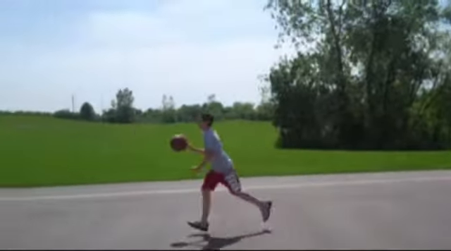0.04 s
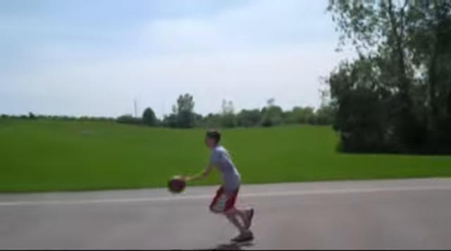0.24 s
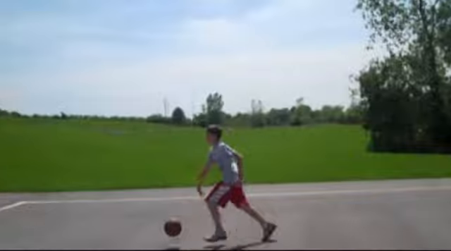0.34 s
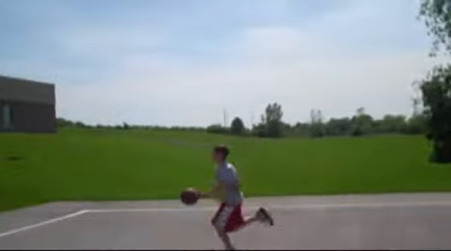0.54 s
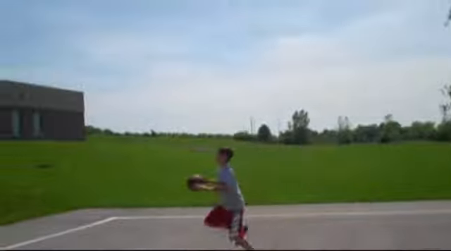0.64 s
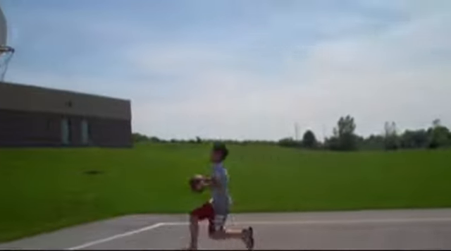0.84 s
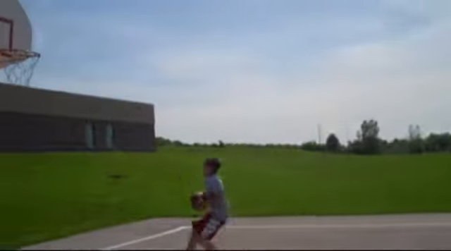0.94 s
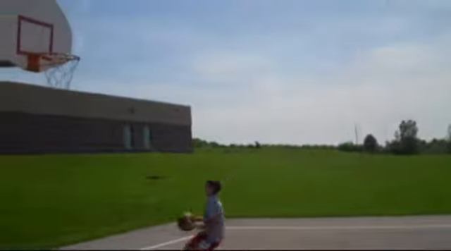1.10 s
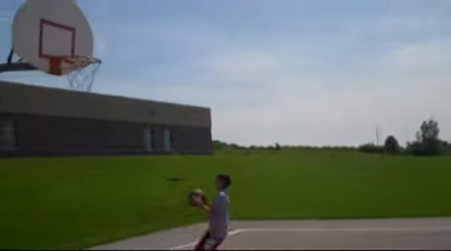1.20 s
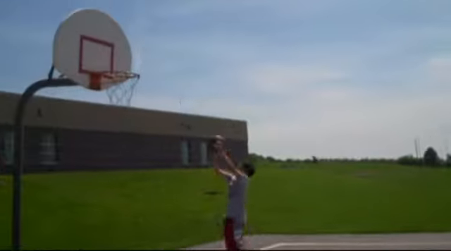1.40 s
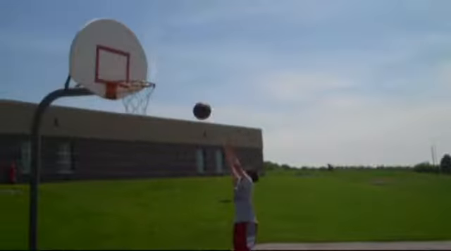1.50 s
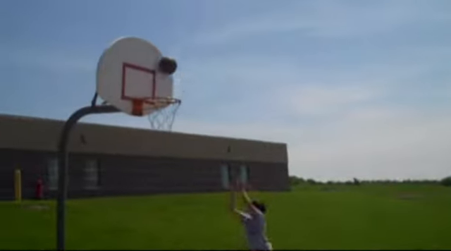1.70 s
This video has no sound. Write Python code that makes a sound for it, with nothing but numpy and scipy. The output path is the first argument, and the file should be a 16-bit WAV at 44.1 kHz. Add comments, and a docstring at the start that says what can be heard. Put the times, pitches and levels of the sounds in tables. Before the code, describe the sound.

One hard, short basketball slap on an open outdoor court, followed by a crunchy double shoe skid before a jump. Soft hiss underneath; low wind gusts buffet each side of the stereo microphone, overloading at the strongest, then calming.

```python
"""A soft outdoor hiss and light wind are heard first; then gusts buffet the two microphone ports separately.
A player steps, dribbles a basketball once on an outdoor asphalt court, plants both shoes with a gritty
skid and jumps. The ball is a sum of decaying modes with a noise crack; the shoes are resonant noise
bursts over a gritty rush; wind and hiss are shaped noise. The strongest peaks overload the ports.
"""
import sys
import numpy as np
from scipy import signal
from scipy.fft import rfft, irfft
from scipy.io import wavfile
from scipy.ndimage import uniform_filter1d

SR = 44100
rng = np.random.default_rng(int(sys.argv[2]) if len(sys.argv) > 2 else 0)


def output_pcm(signal):
    """Save a mono or channel-first signal as 16-bit PCM at the path in sys.argv[1].

    Samples are clipped to [-1, 1] before scaling.
    """
    pcm = np.clip(np.atleast_2d(signal).T, -1, 1) * 32767
    wavfile.write(sys.argv[1], SR, np.round(pcm).astype(np.int16))


N = 77175  # length [samples]

# Spectrum tables give only the shape: the noise is afterwards scaled to rms 1.
# Ball modes: (frequency [Hz], level within the smack [dB], 60 dB decay time [s])
BALL_MODES = [(800, -14.5, 0.022), (1005, -28, .03), (1290, -4, 0.015), (1440, -3.5, 0.015),
              (1916, -5, 0.0068), (2100, -6.5, 0.011), (2940, -11.5, 0.01), (3500, -14, 0.0075),
              (5450, -9.5, 0.0045)]
# Spectrum of the slap's crack: (frequency [Hz], relative density [dB per Hz])
CRACK_SPECTRUM = [(880, -26), (1500, 5.5), (2250, -20), (4640, -8), (5330, -27), (7690, -30), (10800, -14),
                  (16000, -56)]
# Spectrum of the slap's gritty tail: (frequency [Hz], relative density [dB per Hz])
TAIL_SPECTRUM = [(350, -14), (700, -1.5), (1000, 3.5), (2000, -6), (3800, -14.5), (6000, -20.5),
                 (10600, -28), (14000, -60)]
# Later arrivals of the smack: (delay [s], level re smack [dB], low-pass cutoff [Hz], polarity [+1 or -1])
LATER_ARRIVALS = [(.0086, -20, 2500, -1), (.0168, -21, 7000, 1)]
# Grit crushed by the shoes: (peak time [s], level [dB], centre [Hz], resonance width [Hz],
# 60 dB decay time [s], rise time [s])
GRIT_CRUNCHES = [(0.221, -39, 4930, 5900, 0.027, 0.0034), (0.239, -28.5, 1170, 895, 0.013, 0.00218),
                 (0.247, -32, 2950, 3000, 0.017, .002), (.288, -33.5, 3000, 2000, 0.022, .002),
                 (.554, -31.5, 5800, 5900, 0.019, .001), (0.801, -40, 4930, 6950, 0.03, 0.0037),
                 (0.808, -30, 2780, 2880, 0.061, 0.005), (1.130, -24.5, 3240, 2880, 0.017, 0.00063),
                 (1.139, -29.5, 2430, 2000, 0.048, .002), (1.159, -7.5, 3245, 1810, 0.015, .003),
                 (1.161, -26, 8200, 6000, 0.0084, 0.0013), (1.160, -1.5, 750, 313, 0.025, 0.0024),
                 (1.168, -19, 4350, 1500, 0.054, 0.0025), (1.169, -6.5, 3850, 800, 0.034, 0.00137),
                 (1.1761, -7.5, 2800, 2950, 0.0092, .001), (1.1914, -3, 2235, 1420, 0.014, .0025),
                 (1.192, -8, 4660, 4970, 0.005, 0.00101), (1.1935, -6.5, 843, 495, 0.029, 0.00091),
                 (1.200, -21, 6260, 4900, 0.0073, .0007), (1.304, -35.5, 5560, 4930, 0.013, 0.00099)]
# Sole dragging over grit: (time [s], level [dB])
SKID_LEVEL = [(1.153, -45), (1.156, -15.5), (1.172, -21), (1.184, -22), (1.191, -21), (1.204, -28.5),
              (1.23, -35), (1.26, -49)]
# Spectrum of the skid: (frequency [Hz], relative density [dB per Hz])
GRIT_SPECTRUM = [(590, -40), (1000, -8), (1810, -0.5), (3270, -2.5), (5700, -10), (5970, -16),
                 (7440, -11.5), (16000, -30)]
# Changing wind level beneath the gusts at each port: (time [s], left level [dB], right level [dB])
WIND_LEVEL = [(0, -39, -30.5), (0.19, -46, -41), (0.229, -18.5, -29), (0.33, -35.5, -21), (0.44, -30, -22),
              (0.5, -32, -22), (0.6, -25.5, -36), (0.7, -33, -30.5), (0.8, -29.5, -30), (0.86, -17.5, -17),
              (0.95, -20, -34), (1.02, -21.5, -24.5), (1.1, -21, -14), (1.171, -7, -8), (1.24, -12.5, -7),
              (1.36, -21.5, -14.5), (1.422, -19.5, -24), (1.5, -35.5, -36), (1.62, -44, -38.5),
              (1.7, -35, -35), (1.75, -34, -40)]
# Gusts that swell at one port: (time [s], port [0 left, 1 right], level [dB], full width at 1/e power [s])
PORT_GUSTS = [(0.052, 0, -46, 0.018), (0.07, 1, -44, 0.017), (0.166, 0, -30.5, 0.026),
              (0.223, 1, -17.5, 0.024), (0.23, 0, -13.5, 0.017), (0.341, 0, -17, 0.031),
              (0.421, 0, -29, 0.016), (0.443, 1, -11, 0.026), (0.504, 0, -29, 0.032),
              (0.564, 1, -23, 0.0082), (0.628, 1, -26.5, 0.037), (0.628, 0, -21.5, 0.052),
              (0.697, 0, -16, 0.044), (0.689, 1, -12, 0.024), (0.786, 1, -25, 0.008),
              (0.886, 0, -12, 0.024), (0.893, 1, -12, 0.021), (0.936, 1, -11.5, 0.03),
              (0.947, 0, -4.5, 0.024), (0.995, 0, -14.5, 0.018), (1.056, 0, -9.5, 0.025),
              (1.106, 0, -12, 0.0096), (1.209, 0, -6, 0.019), (1.339, 0, -7.5, 0.028),
              (1.353, 1, -3, 0.035), (1.419, 0, -15, 0.012), (1.532, 0, -43, 0.02), (1.55, 1, -32.5, 0.015),
              (1.61, 0, -27, 0.014), (1.726, 1, -25.5, 0.02), (1.748, 0, -20, 0.034)]
# Spectrum of the main wind layer: (frequency [Hz], relative density [dB per Hz])
WIND_SPECTRUM = [(35, -22), (60, -4.5), (100, 3.5), (160, 2), (230, -1), (300, -7.5), (450, -16.5),
                 (700, -32), (1100, -48), (2000, -100)]
# Single eddies at one port: (time [s], port [0 left, 1 right], envelope peak [dB], time scale [s])
PORT_EDDIES = [(0.226, 0, -14.5, 0.00081), (0.229, 1, -10, 0.00051), (0.352, 0, -5, 0.0016),
               (0.366, 0, -12.5, 0.00059), (0.391, 1, -1.5, 0.00068), (0.451, 1, -8, 0.001),
               (0.563, 1, -9.5, 0.00076), (0.622, 0, -13, 0.00075), (0.685, 0, -14.5, 0.00037),
               (0.849, 0, -9.5, 0.00042), (0.851, 1, -9, 0.00083), (0.874, 1, -1, 0.00063),
               (0.898, 1, -9.5, 0.00083), (0.931, 1, -22, 0.00083), (0.939, 0, -12, 0.00021),
               (0.949, 0, 2.5, 0.00074), (0.96, 0, -3, 0.00097), (1.034, 0, -9, 0.00079),
               (1.048, 0, -11, 0.0007), (1.064, 0, 4, 0.00063), (1.066, 1, -5.5, 0.00027),
               (1.106, 0, -8.5, 0.00051), (1.117, 1, -9, 0.00085), (1.143, 0, -14, 0.0011),
               (1.152, 1, -13, 0.00069), (1.204, 1, 7, 0.00068), (1.219, 1, -1.5, 0.00027),
               (1.233, 1, 0, 0.00071), (1.246, 1, 0, 0.0013), (1.259, 1, 1.5, 0.00078),
               (1.279, 1, -19, 0.0013), (1.29, 1, -8, 0.00056), (1.292, 0, -9, 0.00067),
               (1.303, 1, -9, 0.0005), (1.318, 1, 4.5, 0.00045), (1.328, 0, -5, 0.00043),
               (1.337, 1, 6.5, 0.00069), (1.345, 1, 0, 0.00061), (1.353, 1, -24, 0.00028),
               (1.375, 1, 11.5, 0.0005), (1.393, 1, -9, 0.00042), (1.406, 1, -2.5, 0.00084),
               (1.415, 0, -6.5, 0.00079), (1.453, 1, -10.5, 0.00065)]
# Spectrum of the hiss: (frequency [Hz], relative density [dB per Hz])
AIR_SPECTRUM = [(200, -27), (350, -10), (550, -5), (900, -6), (1300, -3), (1800, -6), (3650, -6),
                (6000, -13), (11100, -25.5), (13000, -46), (16000, -80)]
# Left-right likeness of the hiss: (frequency [Hz], correlation [-1 to 1])
AIR_LIKENESS = [(60, 0.23), (130, 0.11), (290, 0.97), (640, 0.96), (1410, 0.76), (3100, 0.29),
                (6820, -0.23), (15000, -0.061)]
# The hiss rises with the wind: (time [s], change re AIR_DB [dB])
AIR_RISE = [(0, -0.8), (.5, -1.05), (.7, 1.06), (1.0, 2), (1.35, 1.5), (1.5, 0.06), (1.75, 0.1)]

# Ball
BOUNCE_S, BOUNCE_DB = .491, 1  # the level applies to the whole smack
SWELL_DELAY_S, SWELL_HZ, SWELL_DB, SWELL_T60_S = .001, 150, -7, .02
CRACK_DB, CRACK_T60_S, TAIL_DB, TAIL_T60_S = 1, .005, -16.5, .066
SLAP_RISE_S, TAIL_SIDE_DB = .00012, -5.5
RETURN_THUMP_S, RETURN_THUMP_DB, RETURN_THUMP_WIDTH_S = .5004, -5.5, .00035

# Shoes
RING_SHARE = .21  # power share of clean sole ring in a very narrow crunch
FIZZ_DB, FIZZ_HZ = -27, 7800  # treble edge, relative to each crunch
GRAIN_DB = 1.5  # boost per unit of the random grain size
SHOE_PAN_DB, SHOE_LIKENESS = 1.7, .88  # left over right, then left-right correlation before it
FAR_HZ = 9000  # treble lost on the way from the player

# Wind; a follow exponent above 1 swells more than the level, below 1 less
REF_DB = -15  # wind level at which rumble and rasp have their set balance
LUMP_DB, LUMP_S = 1.0, .008  # rms level flicker and its smoothing span
RUMBLE_HZ, RUMBLE_DB, RUMBLE_FOLLOW = 41.8, -5.5, .63
RASP_HZ, RASP_DB, RASP_FOLLOW = 389, -19, 1.45
EVEN_S, EVEN_SHARE = .013, .38  # how far the noise's own swells are smoothed out
EDDY_TURN = 1.296  # phase advance per time scale [rad]

AIR_DB = -38.5
KNEE, EDGE_HZ = 10, 16400  # overload exponent, recording band limit


def amp(db):
    """Amplitude ratio follows from level as ten to the power of dB over twenty."""
    return 10 ** (np.asarray(db) / 20)


def evened(x):
    """Dividing by the root mean square gives each channel unit power."""
    return x / np.sqrt(np.mean(x ** 2, axis=-1, keepdims=True) + 1e-20)


def read(points, hz):
    """Interpolation on a logarithmic frequency axis joins the points of a curve."""
    f, value = np.transpose(points)
    return np.interp(np.log(hz + 1), np.log(f + 1), value)


def add(mix, s, sound):
    """Superposition: pressures sum from the given time onward."""
    part = mix[..., round(s * SR):][..., :sound.shape[-1]]
    part += sound[..., :part.shape[-1]]


def coloured(x, points):
    """Linear filtering multiplies the noise spectrum by a tabled response; the result has rms 1."""
    n = x.shape[-1]
    response = amp(read(points, np.fft.rfftfreq(n, 1 / SR)))
    return evened(irfft(rfft(x) * response, n))


def band(x, hz, width_hz):
    """A damped resonator is a conjugate pole pair whose radius sets its bandwidth."""
    r = np.exp(-np.pi * width_hz / SR)
    return signal.lfilter([1, 0, -1], [1, -2 * r * np.cos(2 * np.pi * hz / SR), r * r], x)


def swing(width, phase):
    """A transient pressure swing is a cosine under a hyperbolic-secant envelope, centred 10 ms in."""
    u = (np.arange(882) / SR - .01) / width
    return np.cos(EDDY_TURN * u + phase) / np.cosh(u)


def ball_ring(t):
    """Modal decay: an impact excites the air in the ball; the whole ball squashes late, then swells."""
    ring = sum(amp(db - 60 * t / t60) * np.sin(2 * np.pi * hz * t) for hz, db, t60 in BALL_MODES)
    late = np.maximum(t - SWELL_DELAY_S, 0)
    swell = amp(SWELL_DB - 60 * late / SWELL_T60_S) * np.sin(2 * np.pi * SWELL_HZ * late)
    return ring - swell


def bounce():
    """Impact radiation: the slap cracks, rings the ball briefly and comes back twice, duller."""
    t, centre, side = np.arange(8000) / SR, np.zeros(N), np.zeros(N)
    crack = coloured(rng.standard_normal(len(t)), CRACK_SPECTRUM)
    crack *= amp(CRACK_DB - 60 * t / CRACK_T60_S)
    tail = coloured(rng.standard_normal((2, len(t))), TAIL_SPECTRUM)
    tail *= amp(TAIL_DB - 60 * t / TAIL_T60_S)
    onset = np.minimum(t / SLAP_RISE_S, 1)
    smack = amp(BOUNCE_DB) * (ball_ring(t) + crack + tail[0]) * onset
    add(centre, BOUNCE_S, smack)
    for delay, db, top_hz, polarity in LATER_ARRIVALS:
        dull = signal.lfilter(*signal.butter(2, top_hz, fs=SR), smack)
        add(centre, BOUNCE_S + delay, polarity * amp(db) * dull)
    # The slap's first return adds a low thump; the swing's centre lies 10 ms in
    add(centre, RETURN_THUMP_S - .01, amp(RETURN_THUMP_DB) * swing(RETURN_THUMP_WIDTH_S, np.pi))
    # A second tail of opposite sign at the two ports widens the slap
    add(side, BOUNCE_S, amp(TAIL_SIDE_DB) * tail[1])
    return centre + side * [[1], [-1]]


def crunches():
    """Resonant excitation: short bursts of crushed grit ring the sole."""
    out, t = np.zeros((2, N)), np.arange(4000) / SR
    for s, db, hz, width_hz, t60, rise in GRIT_CRUNCHES:
        grit = rng.standard_normal((2, len(t)))
        ring = np.sqrt(2) * np.sin(2 * np.pi * (hz * t + rng.random()))
        crush = evened(band(band(grit, hz, width_hz), hz, width_hz))
        fizz = amp(FIZZ_DB) * evened(band(grit, FIZZ_HZ, 8000))
        share = max(RING_SHARE * (1 - width_hz / hz), 0)  # wide crunches ring less
        tone = np.sqrt(share) * ring + np.sqrt(1 - share) * crush + fizz
        attack = np.minimum(t / rise, 1) ** 2
        decay = amp(db - 60 * np.maximum(t - rise, 0) / t60)
        add(out, s - rise, tone * attack * decay)
    return out


def skid():
    """Sliding friction: many grains of random strength sum to a shaped noise rush."""
    grain_size = np.minimum(rng.exponential(1, N), 4)
    grains = rng.standard_normal((2, N)) * amp(GRAIN_DB * grain_size)
    s, db = np.transpose(SKID_LEVEL)
    return coloured(grains, GRIT_SPECTRUM) * amp(np.interp(np.arange(N) / SR, s, db, -99, -99))


def shoes():
    """Partial coherence: a shared component makes the two ports' shoe sounds mostly alike."""
    left, other = crunches() + skid()
    right = SHOE_LIKENESS * left + np.sqrt(1 - SHOE_LIKENESS ** 2) * other
    return np.array([left, right]) * amp([[SHOE_PAN_DB / 2], [-SHOE_PAN_DB / 2]])


def wind_pressure():
    """Powers of independent flows add: Gaussian gusts ride on the rising and falling wind at each port."""
    t, (s, left, right) = np.arange(N) / SR, np.transpose(WIND_LEVEL)
    power = amp([np.interp(t, s, left), np.interp(t, s, right)]) ** 2
    for at, port, db, length in PORT_GUSTS:
        power[int(port)] += amp(db) ** 2 * np.exp(-(2 * (t - at) / length) ** 2)
    return np.sqrt(power)


def wind():
    """Turbulent pressure is lumpy low noise, unrelated at each port; strong gusts bring out a rasp."""
    pressure = wind_pressure()
    lump_span, even_span = int(LUMP_S * SR), int(EVEN_S * SR)
    lumps = uniform_filter1d(rng.standard_normal((2, N)), lump_span, 1)
    lumps = evened(uniform_filter1d(lumps, lump_span, 1))
    level = pressure * amp(LUMP_DB * lumps)

    low = coloured(rng.standard_normal((2, N)), WIND_SPECTRUM)
    own_power = uniform_filter1d(uniform_filter1d(low ** 2, even_span, 1), even_span, 1)
    low = evened(low / abs(own_power + 1e-3) ** (EVEN_SHARE / 2))

    rumble = evened(band(band(rng.standard_normal((2, N)), RUMBLE_HZ, 50), RUMBLE_HZ, 50))
    rumble *= amp(RUMBLE_DB + REF_DB) * (pressure / amp(REF_DB)) ** RUMBLE_FOLLOW

    rasp = rng.standard_normal((2, N))
    for width_hz in (490, 520, 620):
        rasp = band(rasp, RASP_HZ, width_hz)
    rasp = evened(rasp) * amp(RASP_DB + REF_DB) * (level / amp(REF_DB)) ** RASP_FOLLOW
    return rumble + level * low + rasp


def buffets():
    """Local eddies: each is one quick pressure swing at a single port."""
    out = np.zeros((2, N))
    phases = rng.uniform(0, 2 * np.pi, len(PORT_EDDIES))
    for (s, port, db, width), phase in zip(PORT_EDDIES, phases):
        add(out[int(port)], s - .01, amp(db) * swing(width, phase))
    return out


def air():
    """Frequency-dependent coherence: distant outdoor hiss, alike at both ports in the middle band."""
    a, b = rfft(rng.standard_normal((2, N)))
    same = read(AIR_LIKENESS, np.fft.rfftfreq(N, 1 / SR))
    pair = irfft(np.array([a, same * a + np.sqrt(1 - same ** 2) * b]), N)
    rise_db = np.interp(np.arange(N) / SR, *np.transpose(AIR_RISE))
    return amp(AIR_DB + rise_db) * coloured(pair, AIR_SPECTRUM)


def scene():
    """Superposition of the player some metres away, the wind at the ports and the hiss."""
    player = signal.lfilter(*signal.butter(2, FAR_HZ, fs=SR), bounce() + shoes())
    return player + wind() + buffets() + air()


def record(dry):
    """Saturation: overload with a short knee at full scale, then a linear-phase band limit."""
    clipped = dry / (1 + abs(dry) ** KNEE) ** (1 / KNEE)
    low_pass = signal.firwin(511, EDGE_HZ, window=("kaiser", 9), fs=SR)
    return signal.oaconvolve(clipped, low_pass[None], "same")


dry = scene()
out = record(dry)
output_pcm(out)
```